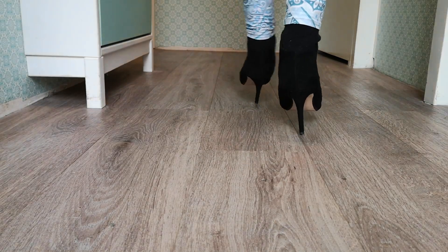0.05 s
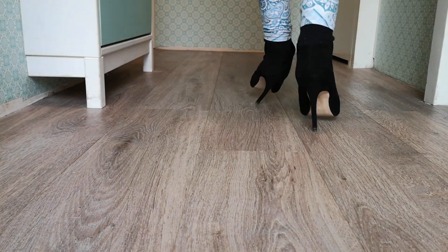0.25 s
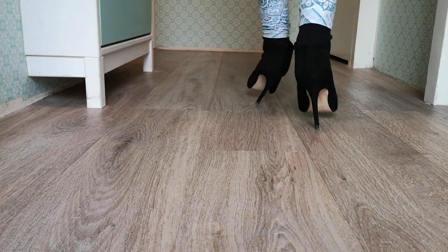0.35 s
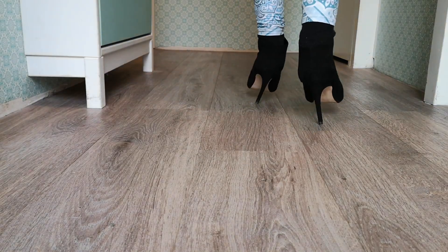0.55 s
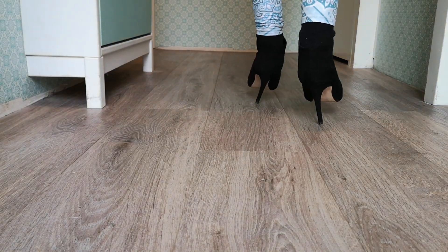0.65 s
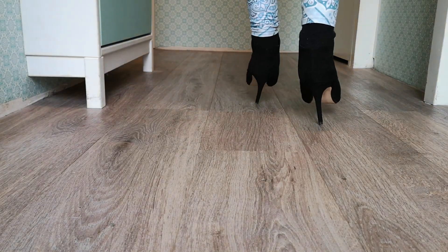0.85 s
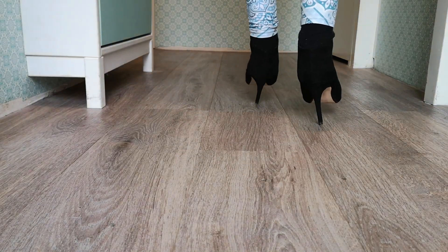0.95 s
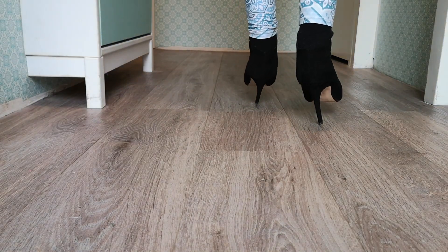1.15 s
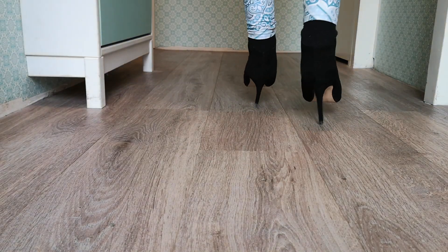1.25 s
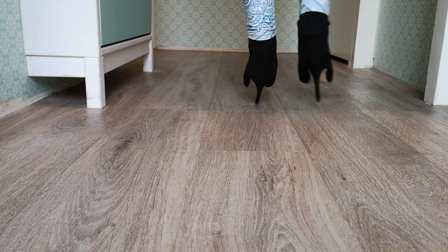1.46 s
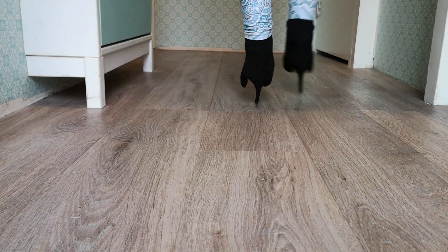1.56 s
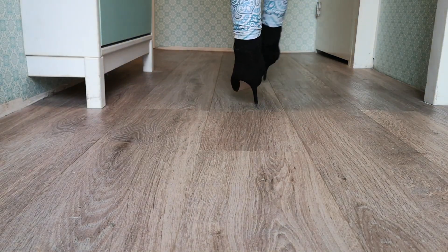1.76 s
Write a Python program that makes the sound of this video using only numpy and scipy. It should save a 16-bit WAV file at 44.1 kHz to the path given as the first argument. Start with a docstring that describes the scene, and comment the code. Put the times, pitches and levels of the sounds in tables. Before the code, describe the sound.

A high heel clacks once on a laminate floor, close by, making the boards boom in a small room. The sole scuffs softly as the shoe settles, and a faint tick follows over quiet room noise.

```python
"""A high heel comes down on a laminate floor, close by, in a small bare room.
Just after a faint wash of noise, heel tip and sole clack, shoe and plank ring, the weight makes the
boards boom and the room reverberates. The sole scuffs in tiny slips and the shoe settles with soft
bumps; later the tip ticks and the weight shifts once more. Two thin tones die away.
Faint rumble, hiss and hum fill the room."""
import sys
import numpy as np
from scipy import signal
from scipy.fft import rfft, irfft, next_fast_len
from scipy.io import wavfile

SR = 44100
rng = np.random.default_rng(int(sys.argv[2]) if len(sys.argv) > 2 else 0)


def transcribe(u):
    """Save the signal u as a 16-bit wav file named by the first command-line argument.

    u: samples, shape (n,) or (channels, n), limited to [-1, 1]; the rate is SR.
    q: integer samples, one column per channel.
    """
    v = np.clip(np.atleast_2d(u).T, -1, 1)
    q = np.round(v * 32767).astype(np.int16)
    wavfile.write(sys.argv[1], SR, q)


N = 79380
TIME_S = np.arange(N) / SR
FFT_SIZE = next_fast_len(2 * N)
BIN_HZ = np.maximum(np.fft.rfftfreq(FFT_SIZE, 1 / SR), 10)
HALF_LR = np.array([[.5], [-.5]])  # splits a left-right difference

# heel tip and sole impacts: t/s, level/dB, tilt/(dB/oct), pan/dB, room/dB
STRIKES = [(0.2378, -1.5, 1, -1, -1.5), (0.2446, -10.5, 2, 9.5, 4), (0.248, -3, -1.5, 2.5, 4)]
# left-right correlation of the room's sound: f/Hz, correlation
ROOM_CORRELATION = [(150, 0.98), (330, 0.38), (550, -0.6), (900, 0.04), (1500, 0.33), (2200, -0.31),
                    (3500, -0.025), (8000, -0.23)]


def from_db(db):
    """Decibels to gain."""
    return 10 ** (np.asarray(db) / 20)


def unit_rms(x):
    """Scale to rms 1."""
    return x / np.sqrt(np.mean(x ** 2) + 1e-20)


def at_hz(points, hz):
    """Interpolate a table over log frequency."""
    table_hz, value = np.transpose(points)
    return np.interp(np.log(hz), np.log(table_hz), value)


def pan(db):
    """Stereo gains for a left-right level difference."""
    return from_db(HALF_LR * db)


def curve_db(points, tilt_db_oct=0):
    """Level per FFT bin, tilted about 2.5 kHz."""
    return at_hz(points, BIN_HZ) + tilt_db_oct * np.log2(BIN_HZ / 2500)


def colour(x, response_db):
    """Minimum-phase filter."""
    cepstrum = irfft(np.log(from_db(response_db)), FFT_SIZE)
    causal_fold = 1 + np.sign(np.fft.fftfreq(FFT_SIZE))
    response = np.exp(rfft(cepstrum * causal_fold))
    return irfft(rfft(x, FFT_SIZE) * response, FFT_SIZE)[..., :N]


def decay(start_s, t60_s, rise_s):
    """Envelope: smooth rise, exponential fall."""
    age_s = np.maximum(TIME_S - start_s, 0)
    return (1 - np.exp(-(age_s / rise_s) ** 2)) * from_db(-60 * age_s / t60_s)


def ring(start_s, hz, t60_s, rise_s, phase_rad=0):
    """One damped mode."""
    return decay(start_s, t60_s, rise_s) * np.sin(2 * np.pi * hz * (TIME_S - start_s) + phase_rad)


def diffuse_noise(correlation_table):
    """White stereo noise with the given left-right correlation."""
    correlation = at_hz(correlation_table, BIN_HZ)
    mid, side = rfft(rng.standard_normal((2, FFT_SIZE)))
    mid *= np.sqrt((1 + correlation) / 2)
    side *= np.sqrt((1 - correlation) / 2)
    return irfft([mid + side, mid - side], FFT_SIZE)[:, :N]


def room_tone():
    """Low rumble, soft hiss and wavering lines of hum."""
    # background noise spectrum: f/Hz, relative density/dB
    air_spectrum = [(20, -1.5), (40, 2.5), (95, -1), (180, -8), (230, -12.5), (480, -15.5), (570, -21),
                    (750, -26.5), (1000, -21.5), (1400, -27.5), (1680, -19), (1950, -23), (2700, -25),
                    (4000, -32.5), (7800, -35), (11000, -42), (15500, -43)]
    # its left-right correlation: f/Hz, correlation
    air_correlation = [(100, 1), (300, 0.74), (600, -0.63), (1200, 0.52), (2000, -0.13), (4000, -0.13),
                       (10000, -0.073)]
    # hum lines: f/Hz, level/dB
    hum_lines = [(350, -80.5), (492, -79), (1233, -85.5), (1658, -84)]
    air_db, waver_db = -61, 4.5
    out = from_db(air_db) * unit_rms(colour(diffuse_noise(air_correlation), curve_db(air_spectrum)))
    for hz, db in hum_lines:
        waver = np.interp(TIME_S, np.linspace(0, N / SR, 20), rng.standard_normal(20))
        phase_rad = 2 * np.pi * hz * TIME_S + waver / 2 + rng.uniform(0, np.pi, (2, 1))
        out += np.sqrt(2) * from_db(db + waver_db * waver) * np.sin(phase_rad)
    return out


def room_response():
    """Dense reflections that last longest in the bass; unit energy."""
    # reverberation time: f/Hz, t60/s
    reverb_times = [(250, 0.95), (500, 0.48), (1000, 0.46), (2000, .48), (4000, 0.4), (8000, .35),
                    (14000, 0.55)]
    noise = rfft(diffuse_noise(ROOM_CORRELATION), FFT_SIZE)
    centres_hz = np.geomspace(250, 16000, 7)
    out = 0
    for hz, weights in zip(centres_hz, np.eye(len(centres_hz))):
        band_gain = at_hz(np.c_[centres_hz, weights], BIN_HZ)
        band = irfft(noise * band_gain, FFT_SIZE)[:, :N]
        out += band * decay(0, at_hz(reverb_times, hz), rise_s=0.0062)
    return unit_rms(out) / np.sqrt(N)


def contact(start_s, t60_s, room, room_db):
    """Unit-energy noise burst plus the room's reflections."""
    burst = diffuse_noise(ROOM_CORRELATION) * decay(start_s, t60_s, rise_s=t60_s / 20)
    reflections = np.pad(room, ((0, 0), (int(start_s * SR), 0)))[:, :N]
    return unit_rms(burst) / np.sqrt(N) + from_db(room_db) * reflections


def faint_tones():
    """Thin tones swell and die as the shoe settles and as it lifts."""
    # tones: t/s, f/Hz, level/dB, t60/s, rise/s
    tones = [(.668, 727, -65, .38, .03), (1.61, 605, -77, .8, .025)]
    return sum(from_db(db) * ring(start_s, hz, t60_s, rise_s) for start_s, hz, db, t60_s, rise_s in tones)


def sole_scuffs(room):
    """The sole rubs the floor in swells of tiny random slips."""
    # rubs: peak t/s, level/dB, rise/s, fall/s, tilt/(dB/oct)
    rubs = [(0.429, -46.5, 0.015, 0.019, -1), (0.492, -57, 0.0093, .03, -6.5),
            (0.558, -60.5, 0.024, 0.028, 3), (.594, -60.5, .01, 0.017, 1), (1.161, -77, 0.017, 0.013, -6.5)]
    # friction spectrum: f/Hz, level/dB
    rub_spectrum = [(300, -45), (700, -10.5), (1200, -1.5), (2400, -3), (4000, -4.5), (6000, -5.5),
                    (8000, -1), (10000, -7.5), (11500, -20.5), (15000, -27)]
    slips_per_s, spread_db, room_db = 3000, -1, -2
    out = 0
    for peak_s, db, rise_s, fall_s, tilt_db_oct in rubs:
        slipping = rng.random(N) < slips_per_s / SR
        strength = from_db(spread_db * np.minimum(rng.exponential(1, N), 3))
        slips = unit_rms(slipping * strength * rng.standard_normal((2, N)))
        swell = np.exp(np.minimum((TIME_S - peak_s) / rise_s, (peak_s - TIME_S) / fall_s))
        shape_db = curve_db(rub_spectrum, tilt_db_oct)
        filter_rms = np.sqrt(np.mean(from_db(shape_db) ** 2))
        out += from_db(db) * colour(slips * swell, shape_db) / filter_rms
    return out + from_db(room_db) * signal.fftconvolve(out, room, axes=1)[:, :N]


def wash_and_ticks(room):
    """A faint, reverberant wash of noise just before the clack; later the heel tip ticks and pings."""
    # the wash, then three ticks: t/s, level/dB, tilt/(dB/oct), room/dB, ping gain
    events = [(0.2248, -14, -2.5, 19, 0.12), (0.6631, -18.5, 4, 4, 0.23), (1.115, -14.5, -0.5, 3, 0.57),
              (1.7224, -33.5, 3.5, 6, 0.7)]
    # their noise spectrum: f/Hz, level/dB
    spectrum = [(400, -33), (1100, -18.5), (2500, -15), (3500, -17), (4600, -20.5), (7500, -16.5),
                (9800, -25), (11500, -52), (15000, -45)]
    # ping modes: f/Hz, level/dB, t60/s
    ping_modes = [(3200, -30, .011), (3700, -30, .011)]
    out = 0
    for start_s, db, tilt_db_oct, room_db, ping_gain in events:
        burst = contact(start_s, t60_s=0.018, room=room, room_db=room_db)
        noise = colour(burst, curve_db(spectrum, tilt_db_oct))
        ping = 0
        for hz, mode_db, t60_s in ping_modes:
            phase_rad = rng.uniform(0, np.pi / 2, (2, 1))
            ping += from_db(mode_db) * ring(start_s, hz, t60_s, 1 / hz, phase_rad)
        out += from_db(db) * (noise + ping_gain * ping)
    return out


def plank_ring():
    """Shoe and plank ring on from the first strike, reaching the two ears out of step."""
    # shoe and plank modes: f/Hz, level/dB, t60/s, pan/dB, left lead/rad
    modes = [(618, -43, .25, -2, 0), (815, -31.5, .34, 6, .3), (912, -40, .23, 9, 1),
             (1011, -32, .25, 0, -.5), (1458, -38.5, .31, 8, 1.3), (1777, -42, .31, 5, .4),
             (1911, -40, .35, 4, -1.6), (2165, -36.5, .45, -6, 1), (2250, -33, .36, 4, 1.8),
             (2400, -39, .32, 8, -1), (2543, -41, .3, 7, .5), (2729, -42, .25, 0, -.2),
             (2855, -40, .25, 1, -.5)]
    start_s, rise_s = STRIKES[0][0], 0.008
    out = 0
    for hz, db, t60_s, pan_db, lead_rad in modes:
        phase_rad = lead_rad * HALF_LR + rng.uniform(0, 2 * np.pi)
        out += from_db(db) * pan(pan_db) * ring(start_s, hz, t60_s, rise_s, phase_rad)
    return out


def floor_boom():
    """Weight drives the boards' low modes, neighbours in antiphase; the foot damps them."""
    # landings of weight: t/s, level/dB, centre f/Hz, fall-off/(dB/oct), rise/s, t60 factor
    bumps = [(.2250, -1.5, 146, 2, 0.001, 0.98), (0.417, -8, 83.3, 31, 0.015, 0.57),
             (.515, -6, 214, 32.5, 0.013, 0.59), (1.151, -22.5, 92.6, 24, 0.0048, 0.94)]
    # floor modes, the close pair beats: f/Hz, level/dB, t60/s
    modes = [(36.3, -47.5, 1.4), (77.3, -25.5, .42), (87.3, -33.5, 0.83), (105, -30.5, 0.68),
             (131.8, -10.5, 0.36), (141, -12, 0.36), (194.5, -26.5, 0.61), (226.1, -40.5, .45),
             (270.9, -32, 0.509), (424, -54.5, 0.12), (446.9, -38.5, 0.51)]
    right_lag_s = .00018
    out = 0
    for k, (hz, mode_db, t60_s) in enumerate(modes):
        polarity = (-1) ** (k + 1)
        phase_rad = 2 * np.pi * hz * right_lag_s * HALF_LR
        for start_s, bump_db, centre_hz, falloff_db_oct, rise_s, t60_factor in bumps:
            gain = from_db(bump_db + mode_db - falloff_db_oct * abs(np.log2(hz / centre_hz)))
            out += polarity * gain * ring(start_s, hz, t60_s * t60_factor, rise_s, phase_rad)
    return out


def heel_clack():
    """Tip and sole strike in quick succession, each spot with its own reflections."""
    # strike spectrum: f/Hz, level/dB
    clack_spectrum = [(150, -12), (280, -14), (500, -11), (740, -8.5), (830, -3.5), (900, -5), (1010, -5),
                      (1200, -16.5), (1480, -9), (1700, -8), (2200, -1), (2650, -6.5), (3100, -11),
                      (4800, -15), (5500, -24), (6800, -25.5), (7900, -19.5), (8900, -31), (10200, -31),
                      (11500, -51), (15000, -58)]
    # stereo balance: f/Hz, left minus right/dB
    balance = [(400, -2), (650, 0), (850, -1), (1200, 2.5), (2300, -3), (3500, -1.5), (5000, 0), (6500, 1),
               (7900, 8.5), (9600, -4), (12000, -7)]
    gain_db = 17
    out = 0
    for start_s, db, tilt_db_oct, pan_db, room_db in STRIKES:
        crack = contact(start_s, t60_s=0.021, room=room_response(), room_db=room_db)
        out += from_db(gain_db + db) * pan(pan_db) * colour(crack, curve_db(clack_spectrum, tilt_db_oct))
    return colour(out, curve_db(balance) * HALF_LR)


def scene():
    """One step and its after-sounds over the room tone."""
    room = room_response()
    step = floor_boom() + heel_clack() + plank_ring()
    return step + sole_scuffs(room) + wash_and_ticks(room) + faint_tones() + room_tone()


def record(dry):
    """Steep elliptic low-pass."""
    cutoff_hz = 15700
    return signal.sosfilt(signal.ellip(10, .1, 80, cutoff_hz, fs=SR, output="sos"), dry)


dry = scene()
out = record(dry)
transcribe(out)
```